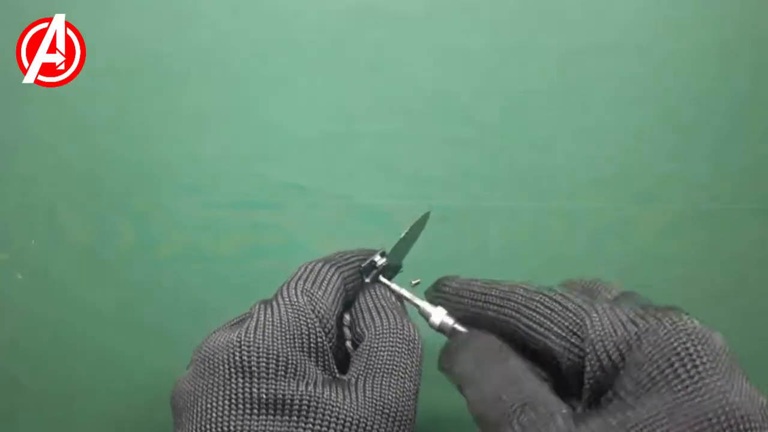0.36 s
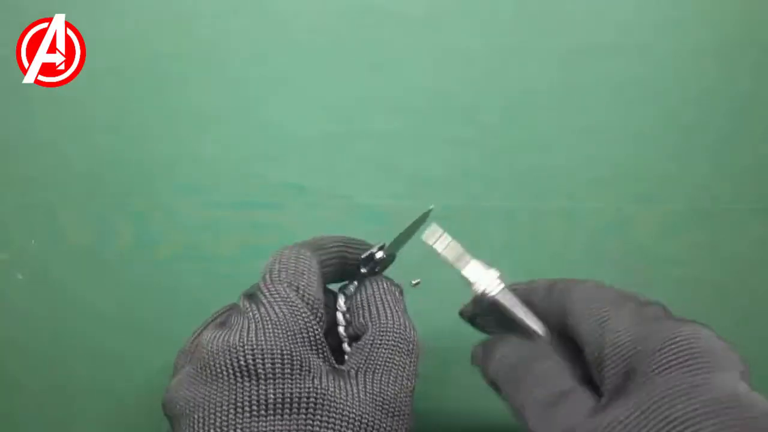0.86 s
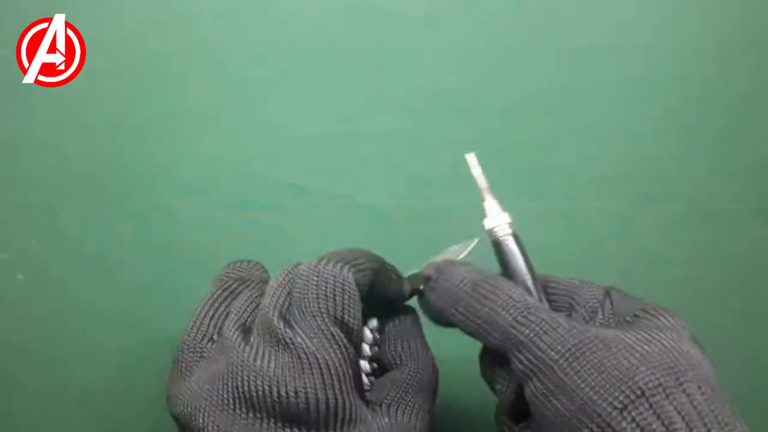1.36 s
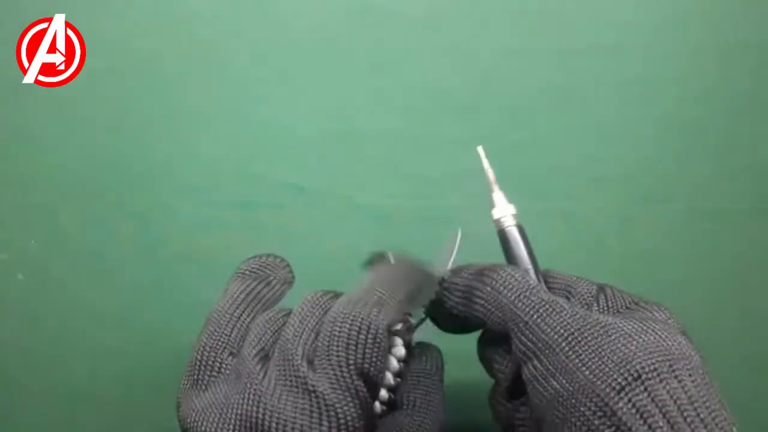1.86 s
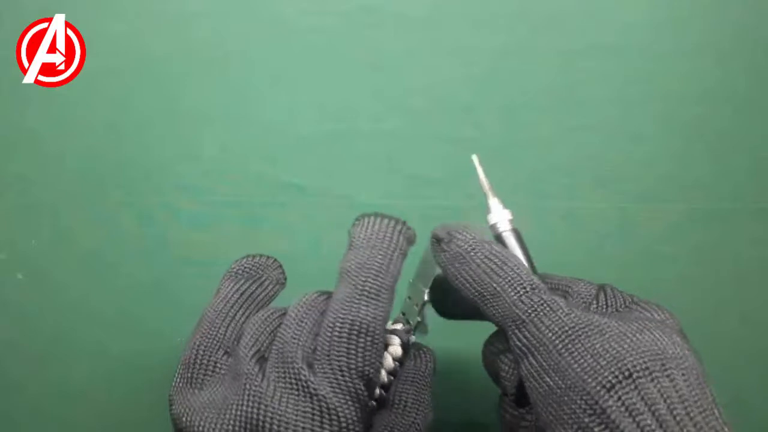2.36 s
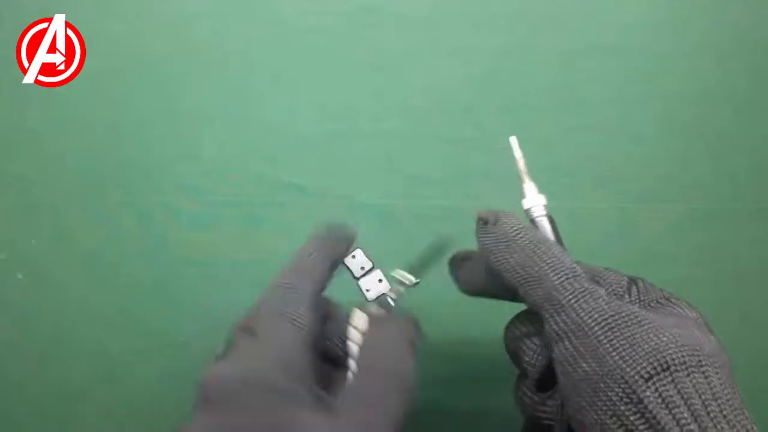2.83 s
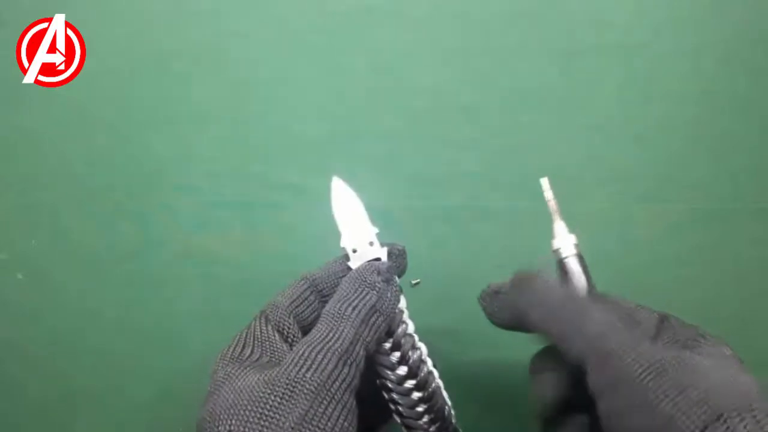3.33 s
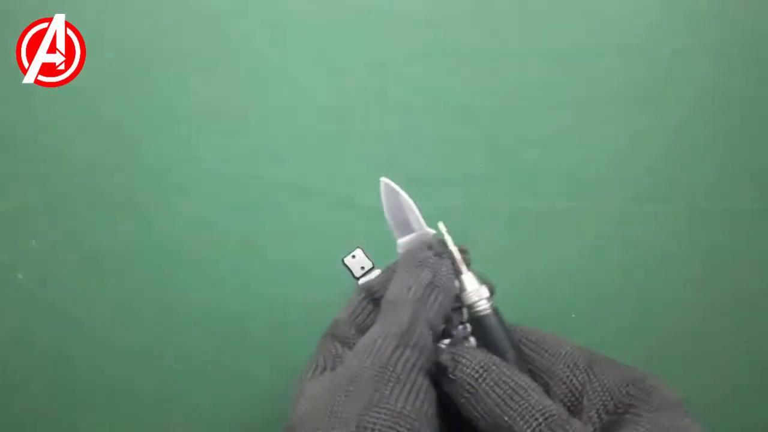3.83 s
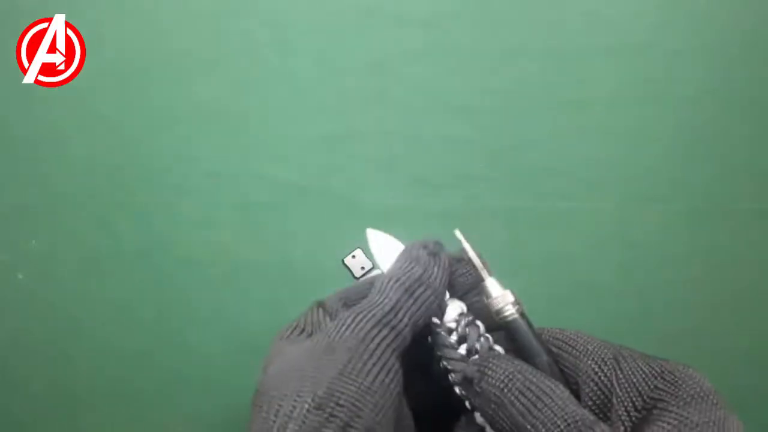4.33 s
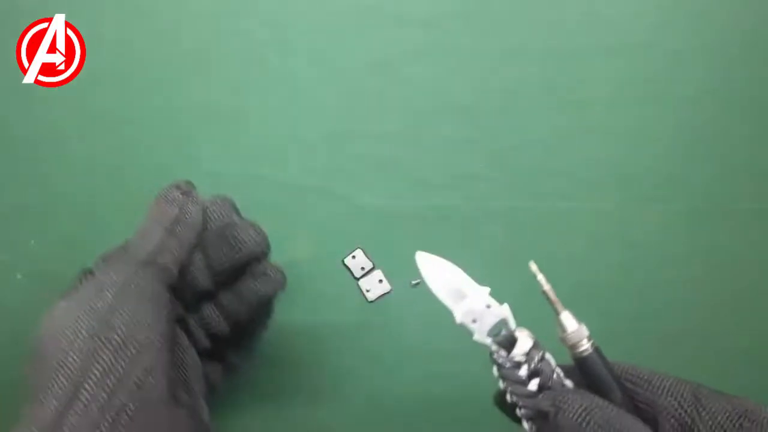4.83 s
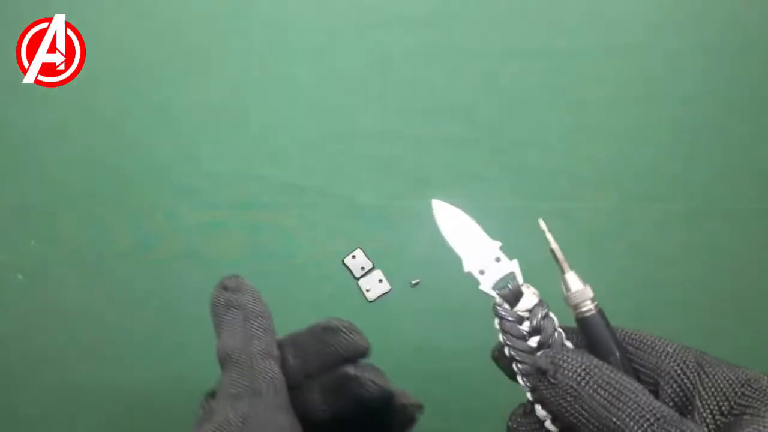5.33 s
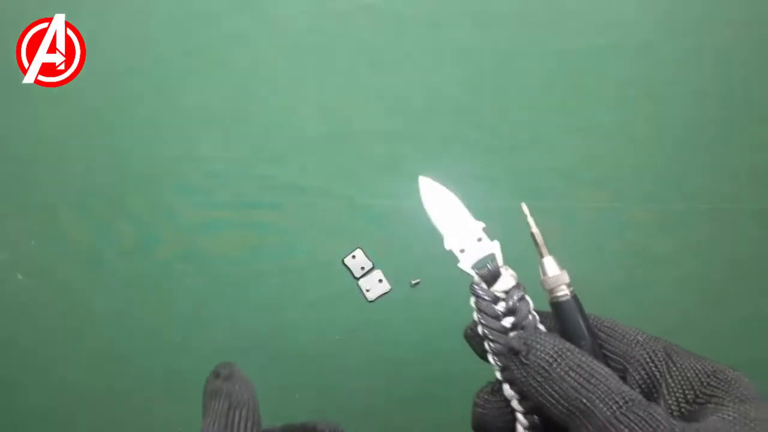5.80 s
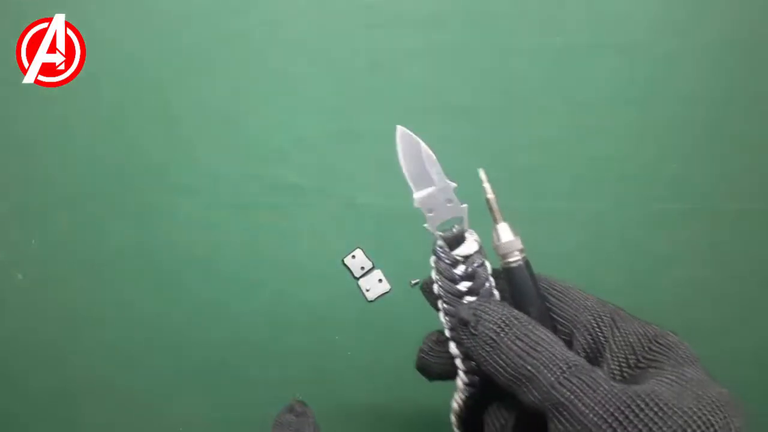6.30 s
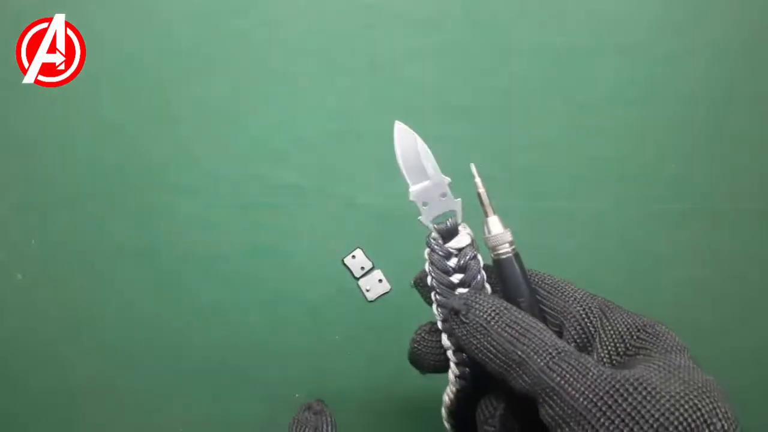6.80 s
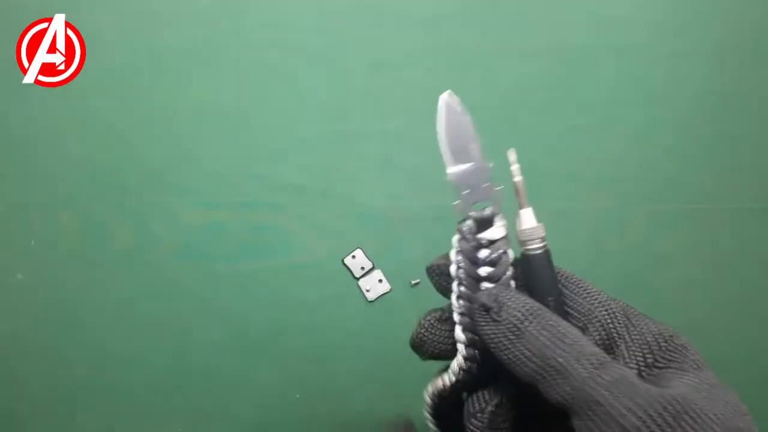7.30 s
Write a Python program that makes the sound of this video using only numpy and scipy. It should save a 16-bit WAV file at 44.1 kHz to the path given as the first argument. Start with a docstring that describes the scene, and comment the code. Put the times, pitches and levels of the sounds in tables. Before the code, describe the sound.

A quiet room beside a street, heard through a phone with gated, hissy background. Gloves rub faintly and small metal taps tick close by. Around two seconds hard panel bangs crack and rattle, then stronger ones with boomy tails and a brief hollow tone. Brake air gushes out and sags away. After a lull with small squeaks, an exhaust note and tyre roar grow until the end.

```python
"""A room beside a street: gloved hands turn a small screwdriver and a linked metal bracelet close to a phone.
The hands are faint treble noise, short bursts and damped modes; squeaks and clear tones come and go.
The street is noise in the room's resonances, roar, whirs and an exhaust note that grows as a vehicle nears.
Panel bangs with ragged tails and a puff of brake air stand out over a steady low hum and drone.
The phone's suppressor turns down bands under its noise estimate; hiss lies over all."""
import sys
import numpy as np
from scipy import signal
from scipy.fft import rfft, irfft, next_fast_len
from scipy.io import wavfile
from scipy.ndimage import uniform_filter1d, map_coordinates

SR = 44100
rng = np.random.default_rng(int(sys.argv[2]) if len(sys.argv) > 2 else 0)


def gain_from_db(level_db):
    """Convert decibel levels to linear amplitude factors (20 dB per decade)."""
    decades = np.asarray(level_db, float) / 20
    return 10 ** decades


def digitize_waveform(pressure):
    """Quantize a signal to 16-bit integers and store it at the path in sys.argv[1].

    Rows of a 2-D input are taken as channels; values are limited to [-1, 1].
    """
    field = np.atleast_2d(pressure).T
    bounded = np.clip(field, -1, 1)
    quanta = np.round(bounded * 32767).astype(np.int16)
    wavfile.write(sys.argv[1], SR, quanta)


N = 327222

# tyre roar as the traffic swells and fades: [t/s, level/dB]
ROAD_LEVEL = [(0, -69.5), (1.9, -68.5), (2.8, -74), (3.05, -62.5), (3.3, -69.5), (3.8, -57), (4.2, -65),
              (5.3, -62.5), (5.8, -57), (6.1, -52), (6.6, -49.5), (7.1, -44.5), (7.42, -41.5)]


def unit(x):
    """Scales a sound to rms 1."""
    return x / np.sqrt(np.mean(x ** 2) + 1e-20)


def along(points, hz):
    """Reads (f/Hz, value) points on a log frequency axis."""
    f, v = np.transpose(points)
    return np.interp(np.log(hz + 1), np.log(f + 1), v)


def curves(rows):
    """Gives one value per sample for each column after the time."""
    s, *columns = np.transpose(rows)
    return [np.interp(np.arange(N) / SR, s, c) for c in columns]


def wobble(rate, size=N):
    """A smooth random curve through rate knots a second."""
    knots = rng.standard_normal(int(size * rate / SR) + 4)
    return map_coordinates(knots, [np.arange(size) * rate / SR])


def noise(response, size=N):
    """Noise of rms 1, shaped by a gain over frequency."""
    m = next_fast_len(size)
    spectrum = rfft(rng.standard_normal(m)) * response(np.fft.rfftfreq(m, 1 / SR))
    return unit(irfft(spectrum, m)[:size])


def coloured(spectrum, size=N):
    """Noise of rms 1 with a (f/Hz, level/dB) spectrum."""
    return noise(lambda f: gain_from_db(along(spectrum, f)), size)


def resonant(hz, width_hz, size=N):
    """Noise of rms 1 through a resonance applied twice."""
    return noise(lambda f: (f * width_hz) ** 2 / ((hz * hz - f * f) ** 2 + (f * width_hz) ** 2), size)


def sine(hz):
    """A sine of rms 1 that follows a frequency curve."""
    return np.sqrt(2) * np.sin(2 * np.pi * np.cumsum(hz) / SR)


def swell(s, length):
    """A bell-shaped rise and fall around s."""
    return np.exp(-2 * ((np.arange(N) / SR - s) / length) ** 2)


def ring(modes, t):
    """Each (f/Hz, level/dB, t60/s) mode as a damped sine, one per row."""
    return np.array([gain_from_db(db - 60 * t / t60) * np.sin(2 * np.pi * hz * t) for hz, db, t60 in modes])


def add(track, s, sound):
    """Mixes a sound in at s seconds."""
    part = track[round(s * SR):][:len(sound)]
    part += sound[:len(part)]


def rumble():
    """Engine rumble booms in four room resonances, each one unsteady."""
    # rumble heard in the room: [t/s, level/dB]
    rumble_level = [(0, -71), (.39, -80.5), (1, -71.5), (1.25, -78), (1.7, -67.5), (1.95, -75), (2.12, -51),
                    (2.29, -48), (2.6, -47), (2.72, -59), (3.02, -45.5), (3.38, -49), (3.49, -40),
                    (3.7, -47.5), (4.19, -48), (4.33, -57), (4.47, -53.5), (4.6, -52), (4.73, -61),
                    (4.85, -60.5), (5.16, -64.5), (5.28, -60.5), (5.34, -57.5), (5.5, -57), (5.9, -56),
                    (6.4, -49), (6.63, -49), (7.17, -45), (7.42, -44.5)]
    # room resonances: [f/Hz, width/Hz]
    room_modes = [(98, 63), (168, 67.5), (280, 48), (420, 295)]
    # the three lower resonances: [level/dB over the rumble's middle, share of its swings]
    lower_booms = [(-5.5, 0.5), (1, 1), (-5, 0.99)]
    # the top resonance: [t/s, level/dB]
    upper_level = [(0, -74), (.4, -75.5), (2.05, -83.5), (2.15, -56), (2.7, -58), (2.89, -75),
                   (3.05, -54.5), (3.4, -69), (3.6, -48.5), (4.1, -57.5), (4.45, -93), (5.89, -91),
                   (6.08, -54.5), (7.42, -45.5)]
    mid_db = -55.5  # swings count from here
    swing_db = curves(rumble_level)[0] - mid_db
    levels = [mid_db + db + share * swing_db for db, share in lower_booms] + curves(upper_level)
    boom = np.zeros(N)
    for db, (hz, width_hz) in zip(levels, room_modes):
        boom += gain_from_db(db + 1.62 * wobble(9) + 0.97 * wobble(3.0)) * resonant(hz, width_hz)
    return boom


def tyre_roar():
    """Tyres on the road: broad noise that follows the traffic."""
    # tyre roar spectrum: [f/Hz, relative level/dB per Hz]
    tyre_spectrum = [(260, -46), (450, -9.5), (590, -6.5), (702, -3.5), (872, -0.5), (1470, -6),
                     (1710, -8.5), (2150, -13.5), (2500, -20.5), (3100, -22.5), (3640, -26.5),
                     (4700, -32.5), (6000, -54.5), (7800, -84), (13200, -120)]
    return gain_from_db(curves(ROAD_LEVEL)[0]) * coloured(tyre_spectrum)


def whir():
    """Two fluttering bands of noise from the traffic; part of the upper one grows with the roar."""
    # the lower whir: [t/s, level/dB]
    whir_level = [(0, -63), (.45, -79), (1.7, -91.5), (2.4, -66), (2.85, -69.5), (3.048, -57), (3.3, -76),
                  (4.1, -61), (4.701, -65.5), (4.95, -58), (5.1, -60), (5.601, -61), (6.201, -54.5),
                  (7.42, -57)]
    steady_db, under_road_db = -75, -30
    low_gain = gain_from_db(curves(whir_level)[0])
    high_gain = gain_from_db(steady_db) + gain_from_db(curves(ROAD_LEVEL)[0] + under_road_db)
    high_gain = high_gain * gain_from_db(0.8 * wobble(7.0))
    low = low_gain * gain_from_db(0.3 * wobble(27)) * resonant(990, 140)
    high = high_gain * gain_from_db(0.3 * wobble(27)) * resonant(1720, 240)
    return low + high


def hum():
    """A slightly unsteady narrow hum on a steady low drone, stronger in the right channel."""
    # drone spectrum: [f/Hz, relative level/dB per Hz]
    drone_spectrum = [(20, -39.5), (40, -8.5), (70, -13), (100, 2.5), (130, -8.5), (170, -40), (300, -120)]
    hum_db, drone_db, lean_db = -69, -72, 2  # hum and drone before the lean
    low = gain_from_db(hum_db + 1.2 * wobble(1.0)) * resonant(100.7, 11.0)
    low = low + gain_from_db(drone_db) * coloured(drone_spectrum)
    return gain_from_db(np.array([[-lean_db], [lean_db]])) * low


def glove_rubs():
    """Knit fibres slip over steel in tiny grains: fluttering treble noise, a faint bed with swells."""
    # fibre spectrum: [f/Hz, relative level/dB per Hz]
    weave_spectrum = [(8000, -65), (9600, -18), (10600, -6.5), (11800, -2.5), (13000, -1.5), (14600, -3),
                      (15200, -14.5), (15400, -63)]
    # glove on metal: [middle t/s, length/s, level/dB]
    rub_list = [(0.274, 0.31, -101), (0.766, 0.11, -90), (1.108, .3, -100), (1.92, 0.15, -83),
                (2.336, 0.025, -78), (2.689, 0.045, -83), (3.528, 0.13, -82), (4.337, 0.093, -89.5),
                (4.578, 0.074, -67.5), (5.715, 0.035, -83.5), (6.029, 0.057, -77), (7.297, 0.1, -92.5)]
    grain = gain_from_db(1.2 * wobble(300) + 0.85 * wobble(43))
    fibres = unit(grain * coloured(weave_spectrum))
    level = gain_from_db(-86.5) + sum(gain_from_db(db) * swell(s, length) for s, length, db in rub_list)
    return level * fibres


def squeaks():
    """Bands of noise, narrow to broad, that swell and fade."""
    # swells of noise: [middle t/s, length/s, f/Hz, width/Hz, level/dB]
    squeak_list = [(.05, 0.2, 1120, 51, -63.5), (0.362, 0.18, 1147, 55, -65.5), (.2, 0.4, 1480, 90, -77),
                   (0.14, 0.53, 1764, 110, -69.5), (.25, 0.55, 1590, 200, -75.5),
                   (0.07, 0.08, 1000, 70, -71), (0.094, 0.14, 288, 150, -64.5), (0.95, 0.3, 287, 34, -69.5),
                   (1.52, 0.21, 1690, 110, -71.5), (2.155, 0.091, 101.6, 32, -47),
                   (2.162, 0.03, 428, 100.3, -41), (2.363, 0.21, 3160, 494, -70.5),
                   (2.373, 0.46, 2430, 2200, -67.5), (2.554, 0.12, 100, 38, -41.5),
                   (2.641, 0.076, 405, 112, -36.5), (3.01, 0.22, 3100, 650, -71),
                   (3.453, 0.037, 3020, 500, -48.5), (3.44, 0.012, 1890, 500, -54),
                   (3.954, 0.11, 3200, 250, -76), (3.477, 0.085, 400, 150, -42),
                   (3.903, 0.15, 2940, 400, -75), (4.033, 0.1, 99, 33, -48.5),
                   (4.526, 0.035, 3276, 1500, -67.5), (4.578, 0.056, 11600, 900, -64),
                   (4.592, 0.027, 12500, 700, -73), (4.59, 0.044, 434, 140, -59.5),
                   (4.6, 0.03, 3200, 1500, -66.5), (4.73, 0.13, 3100, 200, -70),
                   (4.73, 0.11, 3500, 199, -77), (4.742, 0.087, 1670, 250, -70.5),
                   (5.265, 0.97, 1230, 201, -64.5), (5.307, 0.1, 854, 201, -59.5),
                   (5.946, 0.052, 430, 150, -58), (6.623, 0.18, 3170, 200, -77),
                   (6.904, 0.19, 3400, 400, -74), (7.2, 0.18, 3900, 400, -72),
                   (7.398, 0.29, 4133, 1595, -68.5)]
    return sum(gain_from_db(db) * swell(s, length) * resonant(hz, w) for s, length, hz, w, db in squeak_list)


def tones():
    """Brief clear sines, unsteady in pitch and level, that swell and fade."""
    # clear tones: [middle t/s, length/s, mean f/Hz, mean level/dB]
    tone_list = [(0.186, 0.06, 1107, -65), (0.28, 0.06, 1130, -66.5), (0.378, 0.056, 1150, -65),
                 (5.938, 0.058, 410, -54), (2.597, 0.015, 422, -31), (2.636, 0.021, 417, -38),
                 (2.654, 0.0073, 430, -35.5), (2.698, 0.0097, 429, -41), (5.094, 0.012, 875, -54),
                 (5.13, 0.03, 868, -57.5), (5.168, 0.034, 865, -48), (5.203, 0.022, 859, -59)]
    out = np.zeros(N)
    for s, length, hz, db in tone_list:
        level = gain_from_db(db + 2.1 * wobble(60)) * swell(s, length)
        out += level * sine(hz * (1 + 0.0044 * wobble(36)))
    return out


def link_clicks():
    """Bracelet links click: bursts of treble noise with a fast decay and a weaker, slower one."""
    # links: [t/s, level/dB before a common 9 dB cut, f/Hz, quarter of the slower t60/s]
    click_list = [(1.0535, -74, 12300, 0.03), (1.8382, -51.5, 13000, 0.03), (1.889, -40, 15000, 0.03),
                  (1.8896, -50, 11700, 0.015), (1.9776, -54, 15400, 0.025), (2.334, -62.5, 15500, 0.0216),
                  (2.6658, -48, 12400, 0.025), (3.418, -64, 12000, 0.068)]
    out, t = np.zeros(N), np.arange(SR // 4) / SR
    for s, db, hz, quarter_t60 in click_list:
        shake = gain_from_db(-60 * t / 0.009) + 0.18 * gain_from_db(-60 * t / (4 * quarter_t60))
        add(out, s, gain_from_db(db - 9.0) * shake * resonant(hz, 2500, len(t)))
    return out


def tool_taps():
    """The tool tip lands on steel and chatters: damped modes with a short tick of noise."""
    # modes of tip on steel, before each tap's gain: [f/Hz, level/dB, t60/s]
    tap_modes = [(1593, -42.5, 0.021), (1760, -53, 0.054), (2200, -51.5, 0.029), (3500, -66, 0.03)]
    # landing and chatter: [t/s, level/dB over the modes, extra level/dB of the top mode]
    tap_list = [(1.113, 1, -3), (1.121, -5, 10), (1.137, -7, 6), (1.145, -10, 6), (1.162, -12, 0)]
    out, t = np.zeros(N), np.arange(SR // 4) / SR
    onset = 1 - np.exp(-t / 0.00069)
    for s, db, top_db in tap_list:
        *low, top = ring(tap_modes, t)
        tick = gain_from_db(-54.5 - 60 * t / 0.02) * resonant(3800, 3600, len(t))
        tick = tick / (1 + gain_from_db(top_db))  # weaker where the top mode is strong
        add(out, s, gain_from_db(db) * onset * (sum(low) + gain_from_db(top_db) * top + tick))
    return out


def bangs():
    """A panel is struck: a snap, a rattling crack, beating modes, and a street tail whose treble dies first."""
    # strikes: [t/s, level/dB, ring of low, middle, high modes/dB, tail t60/s at 0 Hz, contact dulls above f/Hz]
    bang_list = [(1.9774, -17.5, -9, -18.5, -11, 0.16, 2000), (1.9814, -16, -26, -24.5, -10, 0.72, 7500),
                 (1.999, -24.5, -19, -15.5, -5.5, 0.054, 2500),
                 (2.108, -23.5, -16.5, -8.5, -3.5, 0.057, 1497), (2.4837, -18.5, -2, -5, -6, 0.63, 6500),
                 (2.496, -19.5, -21.5, -0.5, -12, 0.12, 1500), (2.583, -30.5, -3.5, -9, 1, 0.41, 1000)]
    # strike spectrum: [f/Hz, relative level/dB per Hz]
    bang_spectrum = [(40, -48.5), (70, -9.5), (208, -13), (290, -0.5), (690, -8), (830, -4.5), (1060, -4.5),
                     (1670, -8.5), (1930, -8), (3060, -14), (4800, -28), (5600, -39), (6600, -45),
                     (8500, -72.5), (14000, -120)]
    # panel modes, before each strike's gains: [f/Hz, level/dB, t60/s]
    panel_modes = [(150, -10, 0.71), (288, -1, 0.15), (397, 1.5, 0.099), (434, 2, 0.11), (667, -4.5, 0.085),
                   (813, -13, 0.033), (1063, -3.5, 0.12), (1210, -4.5, 0.1), (1587, -15.5, 0.11),
                   (1740, -12, 0.1), (2004, -12.5, 0.11), (2180, -14.5, 0.09), (2850, -22, 0.1),
                   (3100, -6.5, 0.072), (3360, -17.5, 0.044)]
    snap_db, snap_t60_s, snap_top_hz = -17.5, 0.021, 4500  # level relative to the strike
    ragged_db, ragged_s = 2.5, 0.06  # depth of the tail's patches, time they take to form
    mode_hz = np.array([hz for hz, _, _ in panel_modes])
    group = np.digitize(mode_hz, [350, 550])  # low, middle, high
    out, t = np.zeros(N), np.arange(SR) / SR
    for s, db, low_db, mid_db, high_db, t60, dull_hz in bang_list:
        def colour(f):
            """Strike spectrum, raised a little near each mode and dulled by the contact."""
            peaks = 1 + sum(0.33 / (1 + ((f - hz) / 35) ** 2) for hz in mode_hz)
            return gain_from_db(along(bang_spectrum, f)) * peaks / (1 + (f / dull_hz) ** 4)

        hz, u, z = signal.stft(noise(colour, SR), SR, nperseg=256)
        life = t60 * (1 + hz[:, None] / 2500) ** -.45
        patches = uniform_filter1d(rng.standard_normal(z.shape), size=4, axis=0)
        echoes = unit(uniform_filter1d(patches, size=7, axis=1))  # uneven walls
        tail_db = ragged_db * np.clip(u / ragged_s, 0, 1) * echoes - 60 * u / life
        tail = signal.istft(z * gain_from_db(tail_db), SR, nperseg=256)[1][:SR]
        rattle = gain_from_db(2.5 * wobble(350, size=SR))  # loose parts: the level jitters fast
        crack = 2.85 * rattle * gain_from_db(-60 * t / 0.06) * noise(colour, SR)
        bright = noise(lambda f: f * colour(f) / (1 + (f / snap_top_hz) ** 4), SR)
        snap = gain_from_db(snap_db - 60 * t / snap_t60_s) * bright
        beating = gain_from_db(0.9 * np.array([wobble(43, size=SR) for _ in panel_modes]))  # loose panel
        soft = 1 / (1 + (mode_hz[:, None] / dull_hz) ** 4)
        group_gain = gain_from_db(np.array([low_db, mid_db, high_db]))[group, None]
        body = (soft * ring(panel_modes, t) * beating * group_gain).sum(0)
        onset = 1 - np.exp(-t / 0.0011)
        add(out, s, gain_from_db(db) * onset * (gain_from_db(-10.5) * (tail + crack) + body + snap))
    return signal.sosfilt(signal.butter(2, 70, "high", fs=SR, output="sos"), out)


def brake_air():
    """A valve lets out air: a broad rush and a thin treble jet that follow the sagging flow."""
    # rush: [f/Hz, relative level/dB per Hz]
    rush_spectrum = [(260, -1.5), (450, 8.5), (624, -1), (807, 5.5), (1540, -1.5), (2700, -0.5),
                     (2930, 1.5), (4480, -4.5), (4800, -15.5), (6240, -52), (10600, -120)]
    # thin jet: [f/Hz, relative level/dB per Hz]
    jet_spectrum = [(4000, -33), (4800, -2.5), (6000, -8.5), (6800, -11), (7200, -28), (8500, -35),
                    (10000, -94)]
    valve_s, open_s, shut_s = 3.405, 0.083, 4.12  # valve opens, time scale of opening, tank's last breath
    rush_db, jet_db, sag_db_per_s = -30.5, -50.5, 69.5  # levels at full flow; sag of the flow
    t = np.clip(np.arange(N) / SR - valve_s, 0, None)
    opening = 1 - np.exp(-(t / open_s) ** 2)
    closing = np.clip((shut_s - valve_s - t) / .08, 0, 1)
    flow = opening * gain_from_db(-sag_db_per_s * t) * closing
    rush = gain_from_db(rush_db) * flow * coloured(rush_spectrum)
    jet = gain_from_db(jet_db) * flow ** 0.93 * coloured(jet_spectrum)  # swings slightly less than the rush
    return rush + jet


def engine():
    """The nearing vehicle's exhaust note: a sine, slightly unsteady in pitch and level."""
    # exhaust note: [t/s, mean f/Hz, mean level/dB]
    exhaust_note = [(5.25, 173.8, -75), (5.35, 172.7, -56), (5.72, 172.4, -54), (5.8, 172.3, -60),
                    (6.0, 172.4, -52.5), (6.3, 171.5, -47), (6.5, 170.5, -41.5), (6.65, 169.6, -50.5),
                    (6.72, 168.5, -45.5), (6.93, 168, -43.5), (7.2, 167.5, -36.5), (7.3, 169.4, -46),
                    (7.39, 181, -48), (7.42, 180, -50)]
    hz, db = curves(exhaust_note)
    return gain_from_db(db + 0.98 * wobble(12)) * sine(hz + 0.94 * wobble(15))


def scene():
    """All sources are mixed in mono; the channels differ faintly by a smeared copy of the mix, and a slightly
    leaning hum is added."""
    # faint side signal: [f/Hz, level/dB relative to the mono mix]
    side_spectrum = [(30, -12), (60, -24.5), (150, -64.5), (300, -72), (600, -44), (1500, -37.5),
                     (4000, -22.5), (12000, -12)]
    x = rumble() + tyre_roar() + whir() + glove_rubs() + squeaks() + tones()
    x = x + link_clicks() + tool_taps() + bangs() + brake_air() + engine()
    t = np.arange(SR // 20) / SR
    smear = rng.standard_normal(len(t)) * gain_from_db(-60 * t / 0.039)
    smear = smear / np.linalg.norm(smear)
    m = next_fast_len(N + SR)
    tint = gain_from_db(along(side_spectrum, np.fft.rfftfreq(m, 1 / SR)))
    side = irfft(rfft(x, m) * rfft(smear, m) * tint, m)[:N]
    return np.array([x + side, x - side]) + hum()


def suppress(x, steep, floor_db, size=512):
    """Bands under the noise estimate are turned down in proportion; they open fast and close slowly."""
    # noise estimate: [f/Hz, level/dB of white noise with that density]
    noise_estimate = [(400, -67.5), (490, -30.5), (700, -38.5), (850, -40.5), (1000, -35), (1300, -41.5),
                      (1750, -50), (2200, -43.5), (3000, -49.5), (3800, -51), (4700, -52), (6500, -54),
                      (8000, -100)]
    overlap = size * 3 // 4
    hz, _, z = signal.stft(x, SR, nperseg=size, noverlap=overlap, boundary="even")
    # the first channel steers both; the factor gives the level of white noise with this density
    power = uniform_filter1d(abs(z[0]) ** 2 * size * 2 / 3, size=3, axis=0)
    slow = signal.lfilter([.06], [1, -.94], power)
    fast = uniform_filter1d(power, size=5, axis=1) / 4
    level_db = 10 * np.log10(np.maximum(slow, fast) + 1e-15)
    gain_db = np.clip(steep * (level_db - along(noise_estimate, hz)[:, None]), floor_db, 0)
    return signal.istft(z * gain_from_db(gain_db), SR, nperseg=size, noverlap=overlap)[1][:, :N]


def roll_off(x):
    """The treble ends steeply here."""
    return signal.sosfilt(signal.butter(12, 16480, fs=SR, output="sos"), x)


def record(dry):
    """The phone: suppressor, each channel's own band-limited hiss, and a fade of 200 samples at the end."""
    # microphone hiss: [f/Hz, relative level/dB per Hz]
    hiss_spectrum = [(15, -44), (25, -3.5), (101, -8.5), (155, -15.5), (356, -16.5), (396, -20), (518, -27),
                     (1730, -23.5), (1930, -24), (15200, -31)]
    top_hz = 15250
    hiss = np.array([noise(lambda f: gain_from_db(along(hiss_spectrum, f)) * (f < top_hz)) for _ in dry])
    padded = np.pad(dry, ((0, 0), (0, SR // 8)), "reflect")
    quiet = suppress(padded, steep=1.38, floor_db=-13.0)
    fade = np.clip((N - np.arange(N)) / 200, 0, 1)
    mix = (quiet + gain_from_db(-75.0) * hiss) * fade
    return roll_off(mix)


dry = scene()
out = record(dry)
digitize_waveform(out)
```